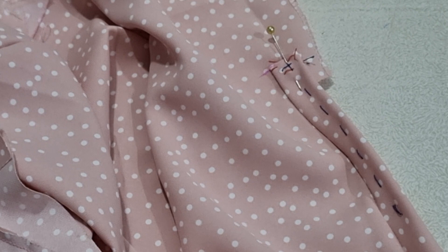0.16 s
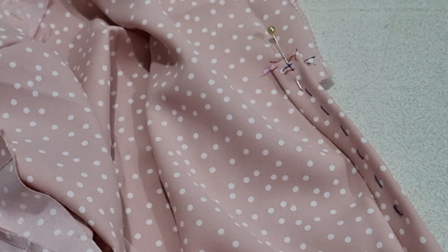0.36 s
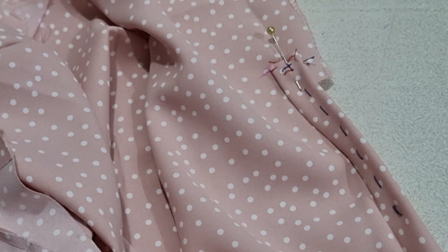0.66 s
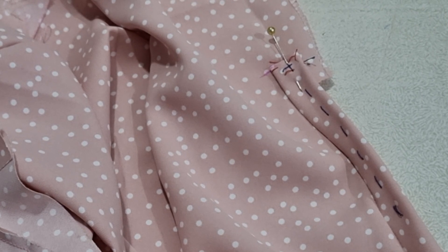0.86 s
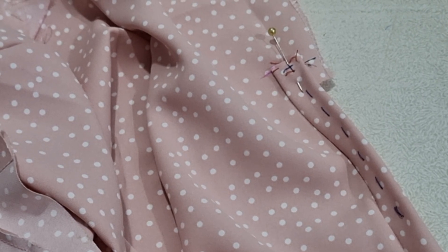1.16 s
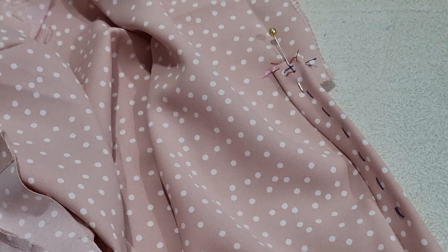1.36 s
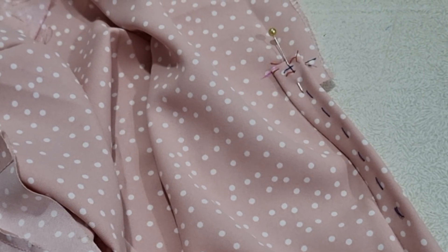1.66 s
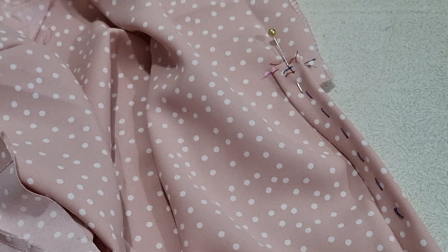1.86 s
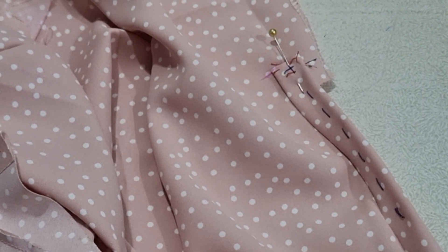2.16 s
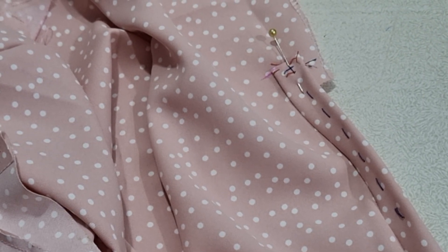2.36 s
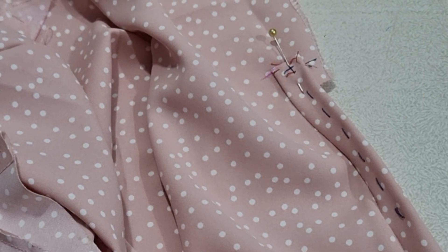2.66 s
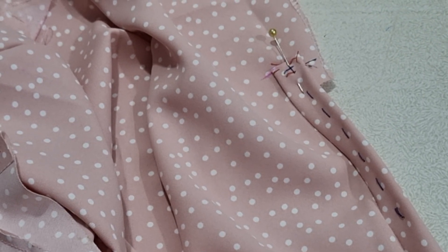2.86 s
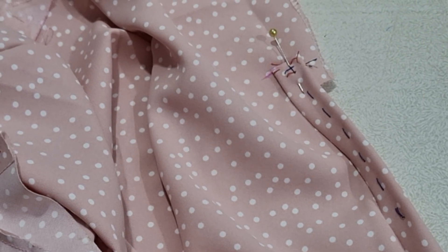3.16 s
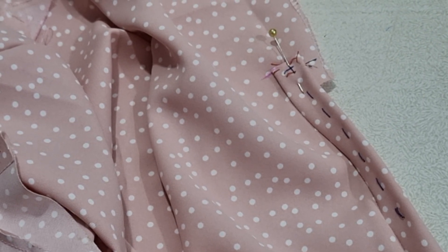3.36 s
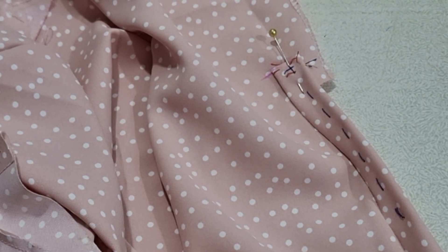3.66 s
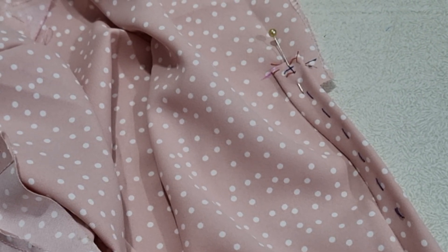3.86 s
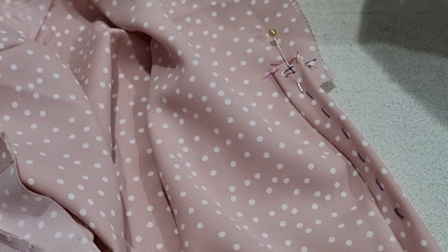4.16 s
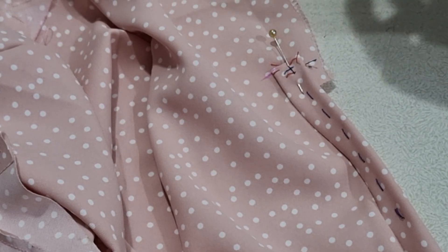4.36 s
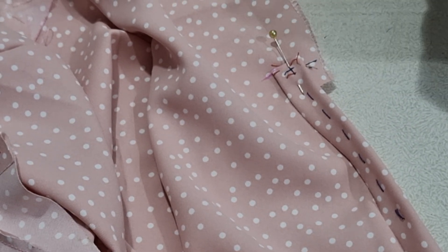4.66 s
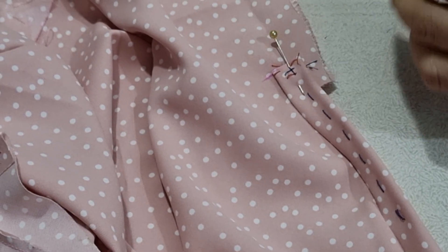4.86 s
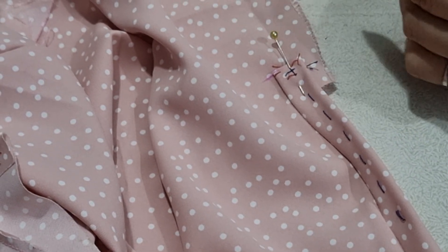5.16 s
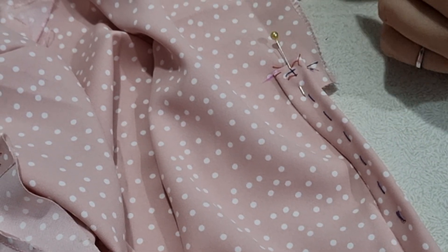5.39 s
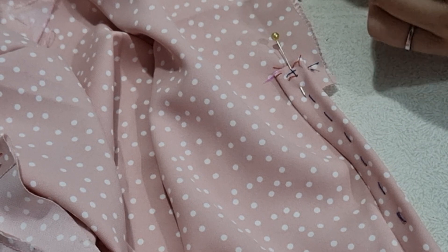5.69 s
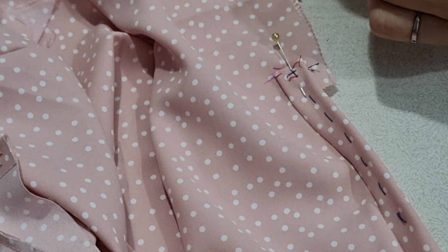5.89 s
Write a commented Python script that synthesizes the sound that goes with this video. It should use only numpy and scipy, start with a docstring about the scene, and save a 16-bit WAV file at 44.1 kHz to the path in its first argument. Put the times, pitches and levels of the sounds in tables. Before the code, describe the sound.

Small tools clack, slide and rattle in a plastic box over a low motor hum, with one soft table bump and faint cloth rustle.

```python
"""A slow motor hums in a small room with a soft rush of air, and a thin hiss comes and goes in a steady beat.
Cloth rustles faintly under the hands. Small sewing tools are picked over in a plastic box beside a
work table: they slide, sing, click and rattle, and something soft bumps the table top.
The hum is a set of sine waves; air, hiss and cloth are coloured noise. The tools are bursts of noise
sent through the resonances of box and tools, and the bump is a set of fading sine waves."""
import sys
import numpy as np
from scipy import signal
from scipy.fft import rfft, irfft, next_fast_len
from scipy.io import wavfile
from scipy.ndimage import uniform_filter1d, map_coordinates

SR = 44100
rng = np.random.default_rng(int(sys.argv[2]) if len(sys.argv) > 2 else 0)


def inscribe(sig):
    """Save sig as 16-bit PCM at rate SR to the path in sys.argv[1].

    A 1-D sig is mono; a 2-D sig holds one channel per row.
    Samples are clipped to [-1, 1] before scaling.
    """
    pcm = np.round(np.clip(np.atleast_2d(sig).T, -1, 1) * 32767)
    wavfile.write(sys.argv[1], SR, pcm.astype(np.int16))


N = 265991  # length of the scene [samples]


def amp(db):
    """Turn decibels into a gain."""
    return 10 ** (np.asarray(db) / 20)


def unit(x):
    """Scale x to an rms of 1."""
    return x / np.sqrt(np.mean(x ** 2) + 1e-20)


def along(points, hz):
    """Read (frequency, value) points at any frequency, on a log frequency axis."""
    f, v = np.transpose(points)
    return np.interp(np.log(hz + 1), np.log(f + 1), v)


def wobble(rate, size=N):
    """A smooth random curve through `rate` random points a second."""
    knots = rng.standard_normal(int(size * rate / SR) + 4)
    return map_coordinates(knots, [np.arange(size) * rate / SR])


def swell(since, rise, fall):
    """A gain that climbs 20 dB in rise seconds to its height and drops 20 dB in fall seconds."""
    return amp(-20 * np.maximum(-since / rise, since / fall))


def filtered(x, response):
    """Multiply the spectrum of x by a response, a function of frequency."""
    size = x.shape[-1]
    padded = 2 * next_fast_len(size // 2 + 4096)  # spare room for the filter's ringing
    spectrum = rfft(x, padded) * response(np.fft.rfftfreq(padded, 1 / SR))
    return irfft(spectrum, padded)[..., :size]


def colour(points):
    """A filter with these (frequency, dB) gains that never sounds before its input."""
    def response(hz):
        cepstrum = irfft(np.log(amp(along(points, hz))))
        half = len(cepstrum) // 2
        # folding the cepstrum onto positive times makes the filter minimum-phase
        folded = np.r_[cepstrum[0], 2 * cepstrum[1:half], np.zeros(half)]
        return np.exp(rfft(folded))
    return response


def resonances(modes):
    """A bank of ringing (frequency, width, dB) modes, added with alternating signs."""
    def response(f):
        total = 0
        for k, (centre, width, db) in enumerate(modes):
            mode = 1j * f * width / (centre * centre - f * f + 1j * f * width)
            total = total + (-1) ** k * amp(db) * mode
        return total
    return response


# How alike left and right are: (frequency [Hz], likeness [0 to 1])
LEFT_RIGHT_LIKENESS = [(30, 0.087), (130, 0.89), (300, 0.87), (700, 0.47), (1500, 0.14), (3000, 0.45),
                       (6000, .05), (10000, 0.14)]


def diffuse(size):
    """Stereo noise: a shared part plus a part of opposite sign left and right, mixed by pitch."""
    def mid_and_side(hz):
        turn = np.arccos(np.clip(along(LEFT_RIGHT_LIKENESS, hz), -1, 1)) / 2
        return np.array([np.cos(turn), np.sin(turn)])
    mid, side = filtered(rng.standard_normal((2, size)), mid_and_side)
    return np.array([mid + side, mid - side])


def rush(spectrum):
    """Steady coloured stereo noise of rms 1."""
    return unit(filtered(diffuse(N), lambda hz: amp(along(spectrum, hz))))


def add(track, s, sound):
    """Mix a sound into the track at s seconds."""
    part = track[:, max(round(s * SR), 0):][:, :sound.shape[-1]]
    part += sound[..., :part.shape[1]]


# The motor's weaker hum lines: (frequency [Hz], level before wavering [dB])
WEAK_LINES = [(54.8, -54.5), (91.5, -67.5), (100, -63.5), (109.7, -63.5), (120, -57), (137.2, -58),
              (193, -68.5), (201.5, -63), (247, -67.5)]
TURN_HZ, DRONE_HZ = 27.42, 68.6  # the motor's turn and a second drone
TURN_DB, THIRD_DB, DRONE_DB = -43.5, -47, -48  # the turn, its third order, the drone
EASE_S, EASE_DB = 3.37, -6  # about when, and how far, the third order and the drone drop


def hum(waver_db=1.0):
    """Low motor lines drift a little in phase; all but the turn waver, and two drop as the hum eases."""
    t = np.arange(N) / SR

    def line(hz, drift):
        phase = 2 * np.pi * (hz * t + rng.random()) + drift * wobble(1.2)
        return np.sqrt(2) * np.sin(phase)

    turn = amp(TURN_DB) * line(TURN_HZ, 0.034) * amp([[-1.6], [1.6]])  # stronger on the right
    eased_db = np.interp(t, [EASE_S - .1, EASE_S + 0.086], [0, EASE_DB])
    upper = sum(amp(db + eased_db + waver_db * wobble(4)) * line(hz, 0.25)
                for hz, db in [(3 * TURN_HZ, THIRD_DB), (DRONE_HZ, DRONE_DB)])
    weak = sum(amp(db + 1.5 * wobble(0.88)) * line(hz, 0.17) for hz, db in WEAK_LINES)
    return turn + upper + weak


# Colour of the room's rush: (frequency [Hz], relative level [dB per Hz])
AIR_COLOUR = [(100, -26.5), (150, -5.5), (200, -5.5), (380, -10.5), (480, -17.5), (700, -14), (920, -19),
              (1300, -22), (4000, -35), (5700, -44), (10000, -65.5), (16000, -66)]
# Colour of the room's rumble: (frequency [Hz], relative level [dB per Hz])
RUMBLE_COLOUR = [(15, -17.5), (40, -15.5), (65, 10.5), (100, 12), (135, 1), (165, -1), (300, -44.5)]
# The rush over time, before the left-right balance: (time [s], level [dB])
AIR_LEVELS = [(0, -51.5), (2.6, -53.5), (5, -53.5), (6.03, -55.5)]


def air():
    """The room's background is noise: a rush that slowly sinks and a steady low rumble."""
    times, levels_db = np.transpose(AIR_LEVELS)
    level_db = np.interp(np.arange(N) / SR, times, levels_db)
    return amp(level_db) * rush(AIR_COLOUR) + amp(-52) * rush(RUMBLE_COLOUR)


def pulsing_hiss(duty=0.57, level_db=-71, idle=0.38):
    """A narrow band of noise drops to the idle gain and returns, over four times a second."""
    cycle = (np.arange(N) / SR - .202) / .2263 % 1  # place within each .2263 s beat
    switch = np.where(cycle < duty, 1, idle) * 1.0
    gate = uniform_filter1d(switch, size=400)  # soften each switch over 400 samples
    hiss = rush([(3900, -36.5), (4700, 7.5), (5200, 3.5), (5650, -35)])
    return amp(level_db + wobble(32)) * gate * hiss


# Colour of rubbing fabric: (frequency [Hz], relative level [dB per Hz])
CLOTH_COLOUR = [(1000, -16), (3000, 3.5), (5500, -1.5), (7300, 3.5), (10300, -7.5), (12500, 1), (15800, -2)]
# Fabric moved by the hands: (start [s], end [s], level before the flutter [dB])
CLOTH_STROKES = [(0, 0.403, -66.5), (.8, 1.2, -80.5), (1.43, 2.44, -62.5), (1.693, 1.83, -61),
                 (2.74, 2.8, -67.5), (3.9, 4.3, -82.5), (4.851, 4.937, -71.5)]
CLOTH_ATTACK_S, CLOTH_RELEASE_S = 0.17, 0.23  # times per 20 dB
CLOTH_REST_DB = -90  # level between strokes


def cloth():
    """Sliding fabric is soft noise with a fine flutter; each stroke rises, holds and dies away."""
    t = np.arange(N) / SR
    strokes = 0
    for start, end, db in CLOTH_STROKES:
        since = t - np.clip(t, start, end)  # zero all through the stroke
        strokes = strokes + amp(db) * swell(since, CLOTH_ATTACK_S, CLOTH_RELEASE_S)
    flutter = amp(1.3 * wobble(49))
    return (amp(CLOTH_REST_DB) + strokes) * flutter * rush(CLOTH_COLOUR)


# How long the room rings at each pitch: (frequency [Hz], time to fall 60 dB [s])
ROOM_DECAY = [(200, 0.08), (1000, 0.18), (2800, 0.17), (7000, 0.11), (15000, 0.14)]


def in_room(x, wet_db, build=0.0037):
    """Add the room's answer: noise that builds quickly, then dies at its own pace at each pitch."""
    hz, t, z = signal.stft(diffuse(x.shape[-1]), SR, nperseg=256)
    decay = amp(-60 * t / along(ROOM_DECAY, hz)[:, None])
    tail = signal.istft(z * decay * (1 - np.exp(-t / build)), SR, nperseg=256)[1]
    tail = tail / np.linalg.norm(tail[0])
    return x + amp(wet_db) * signal.fftconvolve(x, tail, axes=1)[:, :x.shape[-1]]


# The box as a whole: (frequency [Hz], width [Hz], relative level [dB])
HOLLOW_MODES = [(377, 219, -11.5), (652, 150, 3.5), (769.6, 43, 7.5)]
# The box's walls, before each touch varies them: (frequency [Hz], width [Hz], relative level [dB])
WALL_MODES = [(1158, 22, 0), (1229, 18, 1), (1270, 18, -2), (1385, 22, 0), (1471, 20, -4), (1574, 18, -1),
              (1744, 26, -1), (1975, 22, -1), (2055, 20, -1), (2217, 30, -1), (2557, 35, -6),
              (2730, 40, -4), (2832, 40, -6), (3034, 40, -4), (3370, 40, -7)]
# Colour of the plastic clack, before hardness tilts it: (frequency [Hz], relative level [dB per Hz])
CLACK_COLOUR = [(500, -30), (850, -15.5), (1200, 4.5), (2000, -1), (3100, -3), (4000, -10.5), (5500, -14.5),
                (8000, -18.5), (11000, -35), (16000, -70)]
# Colour of the hard tool's bright tick: (frequency [Hz], relative level [dB per Hz])
TICK_COLOUR = [(2000, -6.5), (4500, -1.5), (7000, 1), (8500, -4.5), (10300, -5.5), (12000, -7.5),
               (14000, -2.5), (15800, -9)]


def box(force, clack_db, knock_db, tick_db, hardness, ring_db, place_db=4.5):
    """A force sounds the walls, the hollow box and the hard tool; a harder touch tilts the clack upward."""
    def voiced(response):
        return unit(filtered(force, response))

    # each place of contact favours other wall modes
    walls = [(hz, width, db + place_db * rng.standard_normal()) for hz, width, db in WALL_MODES]
    clack = voiced(colour(CLACK_COLOUR)) + amp(ring_db) * voiced(resonances(walls))
    tilt = colour([(1000, 0), (4000, 2 * hardness)])  # two octaves
    clack = unit(filtered(clack, tilt))
    knock = voiced(resonances(HOLLOW_MODES))
    tick = voiced(colour(TICK_COLOUR))
    parts = amp(clack_db) * clack + amp(knock_db) * knock + amp(tick_db) * tick
    return parts * np.sqrt(np.mean(force ** 2))  # as strong as the force


KNOCK_DB, KNOCK_PER_HARDNESS = -10.5, -0.86  # knock over the touch's level; dB per step of hardness
DAMPED_FROM_S, DAMPED_DB = 1.912, -6  # from then on the hollow box rings less


def hollow_db(s, level_db, hardness):
    """Level of the box's hollow knock: the softer the touch, the more of it."""
    return level_db + KNOCK_DB + KNOCK_PER_HARDNESS * hardness + DAMPED_DB * (s > DAMPED_FROM_S)


def grains(size, depth_db, rate):
    """Noise in uneven clumps: the catch and slip of friction."""
    return unit(diffuse(size) * amp(depth_db * wobble(rate, size=size)))


CATCH_RATE, CATCH_S, CATCH_DB = 40, 0.00088, 5  # catches per second on average, fade time, extra force


def catches(size):
    """A gain that jumps at random moments, as a sliding tool catches, and quickly fades back."""
    moments = rng.random(size) < CATCH_RATE / SR
    fading = signal.lfilter([1], [1, -np.exp(-1 / (CATCH_S * SR))], moments)
    return 1 + amp(CATCH_DB) * fading


# Tools sliding: (time of the height [s], rise per 20 dB [s], fall per 20 dB [s], level [dB],
# hardness [dB per octave])
SLIDES = [(0.431, 0.048, 0.075, -40.5, -1), (.56, 0.069, .02, -36, -6), (.664, .058, 0.055, -27, 3.5),
          (1.17, 0.093, 0.33, -52, -2.5), (1.47, 0.039, 0.13, -27.5, -3.5), (1.64, .05, 0.31, -53, -7.5),
          (1.952, .023, 0.2, -35.5, -2.5), (2.019, 0.059, 0.11, -35.5, 4), (3.489, .02, 0.05, -49, 5),
          (3.7, 0.19, 0.17, -52.5, -1), (3.94, 0.046, 0.21, -51.5, 5.5), (4.01, 0.022, 0.041, -43, -2),
          (4.16, .06, .06, -56, 2), (5.28, .055, 0.055, -46, 1)]
SLIDE_TICK_DB = -17  # the bright tick of a slide, over its level


def slides():
    """A sliding tool drives the box with a swell of small slips and a few catches."""
    out, t = np.zeros((2, N)), np.arange(SR // 2) / SR
    for s, rise, fall, level_db, hardness in SLIDES:
        slips = grains(len(t), depth_db=3.0, rate=450)
        force = swell(t - 2 * rise, rise, fall) * slips * catches(len(t))
        knock_db, tick_db = hollow_db(s, level_db, hardness), level_db + SLIDE_TICK_DB
        sound = box(force, level_db, knock_db, tick_db, hardness, ring_db=-3.5)
        add(out, s - 2 * rise, in_room(sound, wet_db=-7.0))
    return out


# A rubbed or struck tool rasps or sings in one band: (time of the height [s], fall per 20 dB [s],
# frequency [Hz], width of the resonance before it is applied twice [Hz], level [dB])
RINGS = [(0.418, 0.023, 1640, 400, -36.5), (0.662, 0.076, 1000, 303, -33), (.665, 0.041, 3150, 400, -31.5),
         (2.049, 0.0055, 14150, 600, -19), (2.258, .004, 3350, 1540, -19.5),
         (2.318, 0.043, 2850, 2210, -50), (3.61, 0.16, 2517, 1320, -53), (3.735, 0.096, 2960, 1470, -48),
         (4.015, .06, 2045, 161, -45), (4.15, 0.071, 1996, 80, -53.5), (5.3, 0.074, 2133, 250, -53)]
RING_RISE = .8  # a ring's rise over its fall


def rings():
    """Friction or a blow feeds one resonance of a tool, which swells and fades with the stroke."""
    out, t = np.zeros((2, N)), np.arange(SR // 2) / SR
    for s, fall, hz, width, db in RINGS:
        rise = RING_RISE * fall
        mode = resonances([(hz, width, 0)])
        slips = grains(len(t), depth_db=3.5, rate=300) * catches(len(t))
        tone = unit(filtered(slips, lambda f: mode(f) ** 2))  # the resonance applied twice
        sound = amp(db) * swell(t - 2 * rise, rise, fall) * tone
        add(out, s - 2 * rise, in_room(sound, wet_db=-11.0))
    return out


# Tools touching the box and each other: (time of the snap [s], rise per 20 dB [s], level [dB],
# hardness [dB per octave], bright tick over that level [dB])
CONTACTS = [(.411, .002, -36, 1, -7), (.543, .001, -34.5, -2, -18), (.628, 0.0034, -40, -1, -11.5),
            (1.003, 0.00064, -54.5, -14, -28), (1.118, .001, -46, 0, -21.5),
            (1.23, 0.0056, -32.5, 1.5, -22), (1.257, 0.00078, -24.5, -0.5, -21),
            (1.283, 0.00077, -23.5, -1.5, -27.5), (1.408, 0.0024, -29.5, 1, -7),
            (1.422, 0.01, -20.5, -4, -36), (1.444, .003, -13, 1, -20.5), (1.482, .001, -32, 17, -12.5),
            (1.517, 0.0025, -27.5, 0, -29), (1.597, .001, -38, -1.5, -5), (1.649, 0.0012, -42, 0, -15),
            (1.906, 0.0025, -29, -17.5, -22), (1.918, .003, -26, 2, -14.5),
            (1.927, 0.0078, -13.5, 5, -15.5), (2.047, .001, -25.5, 6.5, -0.5),
            (2.063, 0.01, -20.5, 7, -24.5), (2.257, 0.00023, -32.5, 9, -8), (2.3, 0.00044, -37.5, 2, -26),
            (2.855, 0.0025, -62, 3, -30), (3.046, 0.0011, -52.5, 7, -14), (3.174, .002, -47, 8.5, 1.5),
            (3.344, .003, -56.5, 10, -20), (3.414, .002, -43, 5.5, -13), (3.471, 0.0013, -41.5, 1.5, -28),
            (3.695, .001, -43.5, 3, -18), (3.723, 0.0028, -52.5, -1, -19), (3.974, 0.0018, -32, -3.5, -34),
            (3.981, .004, -27, 5.5, -9.5), (5.263, .004, -41.5, 0, -27)]


def contacts(snap_fall=0.0048, chatter_fall=0.018, chatter_db=-13, scatter_db=-3, span=.007):
    """Each contact builds to a snap, partly scattered by things nearby, and ends in chatter."""
    out, t = np.zeros((2, N)), np.arange(SR // 3) / SR
    lead = .025  # time left for the build-up [s]
    for s, rise, level_db, hardness, tick_over_db in CONTACTS:
        direct, scattered = rng.standard_normal(len(t)), diffuse(len(t))
        snap = unit(direct + amp(scatter_db) * scattered) * swell(t - lead, rise, snap_fall + rise / 2)
        chatter = diffuse(len(t)) * swell(t - lead, 2 * rise, chatter_fall)
        force = snap + amp(chatter_db) * chatter
        force *= np.sqrt(2 * span * SR / np.sum(force ** 2))  # as much energy as span seconds at rms 1
        knock_db, tick_db = hollow_db(s, level_db, hardness), level_db + tick_over_db
        sound = box(force, level_db, knock_db, tick_db, hardness, ring_db=-11.0)
        add(out, s - lead, in_room(sound, wet_db=-3.5))
    return out


# The table top's low modes: (frequency [Hz], relative level [dB], time to fall 60 dB [s])
TABLE_MODES = [(117, -8, 0.18), (167, -12, 0.33), (238, 0.5, 0.2), (289, 5, 0.15), (378, -6.5, 0.23),
               (440, -9, 0.18), (587, -22, .08), (700, -22, 0.038)]
# Soft blows on the table, before the left-right balance: (time [s], level [dB])
BUMPS = [(0.539, -20)]


def bumps(attack=0.0025):
    """A soft blow wakes only the table's low modes, each a sine wave that fades."""
    out, t = np.zeros((2, N)), np.arange(SR // 2) / SR
    modes = sum(amp(db - 60 * t / t60) * np.sin(2 * np.pi * hz * t) for hz, db, t60 in TABLE_MODES)
    ring = modes * (1 - np.exp(-t / attack))  # the softness rounds the start
    for s, db in BUMPS:
        add(out, s, in_room(amp(db) * np.array([ring, ring]), wet_db=-11))
    return out


def scene():
    """Tools and cloth over the room's background; air and bumps lean slightly to the right."""
    background = hum() + air() * amp([[-.6], [.6]]) + pulsing_hiss()
    tools = slides() + rings() + contacts()
    return background + cloth() + tools + bumps() * amp([[-1], [1]])


TOP_HZ = 15850  # nothing from here up is kept


def record(dry):
    """Sound reaches the right port a little later than the left, and the highest treble is cut off."""
    lag = np.array([[0], [.000052]])  # left, right [s]
    return filtered(dry, lambda hz: (hz < TOP_HZ) * np.exp(-2j * np.pi * hz * lag))


dry = scene()
out = record(dry)
inscribe(out)
```